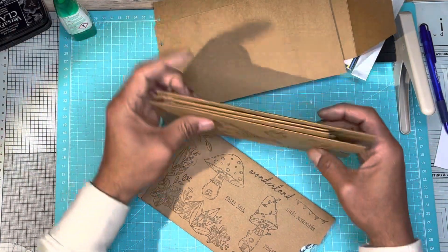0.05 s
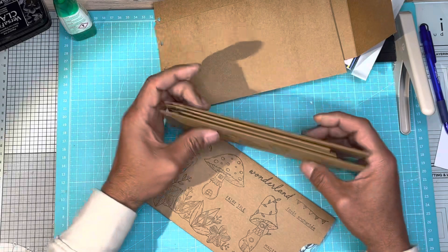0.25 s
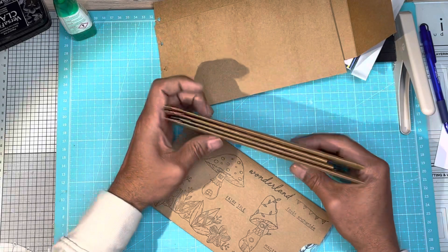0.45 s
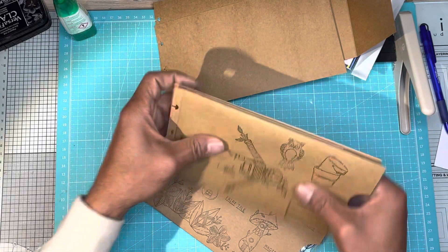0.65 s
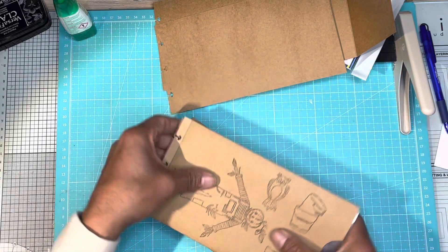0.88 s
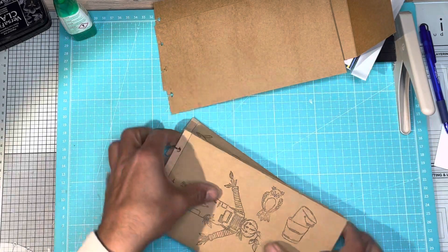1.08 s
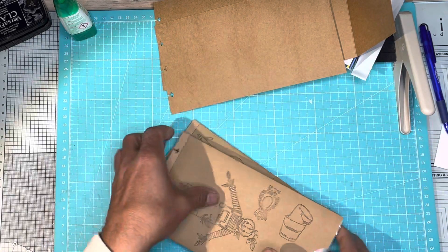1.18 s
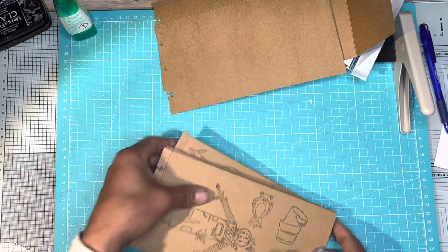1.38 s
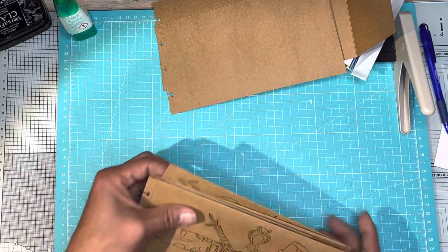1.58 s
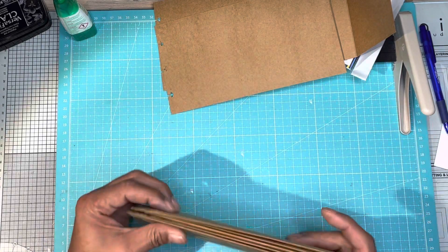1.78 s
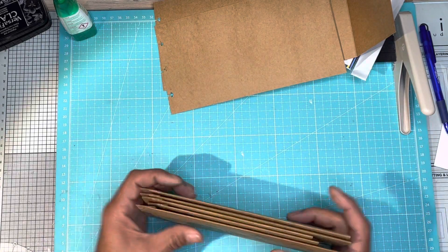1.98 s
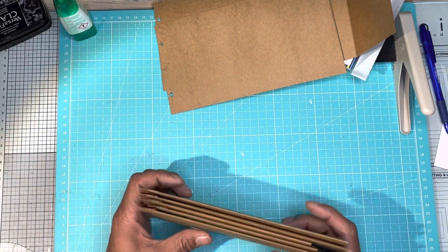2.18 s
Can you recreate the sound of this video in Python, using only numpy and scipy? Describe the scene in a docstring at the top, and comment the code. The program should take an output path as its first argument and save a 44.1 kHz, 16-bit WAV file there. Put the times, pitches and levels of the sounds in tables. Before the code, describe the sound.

A stack of stiff paper cards is knocked on edge against a table with a clattering thump. The cards slide and flick softly into line, then are knocked down again. Heard close up in a small, quiet room.

```python
"""Squaring a stack of cards.

Stiff kraft paper cards are knocked on edge against a craft table, shuffled into line and knocked again.
Faces slide with a fibrous rasp, the table thumps in its low modes, edges land one after another as
bursts of tiny clicks that ring the stack, and single edges flick past each other.
It is heard close up in a small, quiet room, with stereo widening."""
import sys
import numpy as np
from scipy import signal
from scipy.fft import rfft, irfft, next_fast_len
from scipy.io import wavfile

SR = 44100
rng = np.random.default_rng(int(sys.argv[2]) if len(sys.argv) > 2 else 0)


def store_wav(level_fs):
    """Save 16-bit WAV to argv[1]."""
    pcm = np.round(np.clip(np.atleast_2d(level_fs), -1, 1) * 32767)
    wavfile.write(sys.argv[1], SR, pcm.T.astype(np.int16))


N = 99225
FIBRE_HZ = 1484  # rate of the paper's roughness
TOP_HZ = 15900


def undb(db):
    """Decibels to gain."""
    return 10 ** (np.asarray(db) / 20)


def unit(x):
    """Scale to rms 1."""
    return x / np.sqrt(np.mean(x ** 2))


def flutter(hz, size):
    """Random values joined by lines, hz of them a second."""
    return np.interp(np.arange(size) * hz / SR, np.arange(size), rng.standard_normal(size))


def add(track, start_s, sound):
    """Mix a sound in at its time."""
    i = int(start_s * SR)
    lo, hi = max(i, 0), min(i + len(sound), N)
    track[lo:hi] += sound[lo - i:hi - i]


def ring(x, hz, t60_s):
    """One damped resonance, gain 1 at its pitch."""
    return signal.lfilter(*signal.iirpeak(hz, hz * t60_s * np.pi / np.log(1000), fs=SR), x)


def colour(x, points, body_db=0, treble_db=0, grip_db=0):
    """Unit-power filter through (Hz, dB) points, with two shelves and resonances that vary by grip."""
    body_hz, treble_hz, grip_spacing_hz = 900, 3204, 226.7
    size = next_fast_len(len(x) + 2048, real=True) * 2
    hz = np.maximum(np.fft.rfftfreq(size, 1 / SR), 1)
    point_hz, point_db = np.array(points).T
    curve_db = np.interp(np.log(hz), np.log(point_hz), point_db)
    curve_db += body_db / (1 + (hz / body_hz) ** 4) + treble_db / (1 + (treble_hz / hz) ** 4)
    curve_db += grip_db * np.interp(hz / grip_spacing_hz, np.arange(size), rng.standard_normal(size))
    cepstrum = irfft(np.log(unit(undb(curve_db))))
    cepstrum[1:size // 2] *= 2  # fold to minimum phase
    cepstrum[size // 2 + 1:] = 0
    return irfft(rfft(x, size) * np.exp(rfft(cepstrum)))[:len(x)]


# Spectrum of the room's noise. Each row: frequency in Hz, relative level in dB.
ROOM_SPECTRUM = [(22, -26.5), (36, -2.5), (60, 5.5), (120, -5.5), (250, -10.5), (700, -18.5), (2000, -12),
                 (5000, -11.5), (16000, -18)]


def room_noise(level_db=-65.5):
    """The room's faint steady noise."""
    return undb(level_db) * colour(rng.standard_normal(N), ROOM_SPECTRUM)


# Card faces sliding. Each row: fastest moment in seconds, rise in ms, fall in ms, level in dB,
# bass boost and equal treble cut in dB, rasp pitch in Hz.
SLIDES = [(0.202, 8.2, 55, -50, -6, 12900), (0.489, 12.4, 10.4, -56.5, 1, 3980),
          (0.585, 42, 6.5, -59.5, -3, 2060), (0.641, 6, 41, -56, -6, 4230), (.902, 27, 16.7, -49, -4, 5860),
          (0.953, 5.7, 24, -48, 3.5, 1000), (1.024, 14, 42, -44, -1, 970), (1.098, 15.3, 11, -49.5, 5, 860),
          (1.125, 11.3, 11.5, -49.5, 0, 12200), (1.188, 42, 35, -52.5, 5.5, 890),
          (1.222, 24, 10, -50.5, -2.5, 1210), (1.264, 14.5, 9.6, -50, -3, 7400),
          (1.335, 90, 120, -61, 3, 1340), (1.525, 9.3, 17.3, -48.5, -0.5, 1610),
          (1.589, 18, 16, -57, 3, 5230), (1.66, 22.8, 24.5, -47, 3, 4300),
          (1.723, 22, 16.6, -49.5, -2.5, 1330), (1.909, 11.3, 52, -45.5, -6, 2200),
          (2.025, 50, 37, -56, -15, 3930), (2.09, 10, 74, -63, 5.5, 2030)]
# Spectrum of a slide. Each row: frequency in Hz, relative level in dB.
SLIDE_SPECTRUM = [(80, 1.5), (250, -8.5), (450, -1), (650, -3.5), (950, 3.5), (1500, 1), (2100, 2.5),
                  (2900, -2.5), (4400, -1.5), (8000, -5), (13000, -10), (16000, -10.5)]


def slides(fibre_db=3, catch_hz=111, catch_db=3.5, rasp_db=2.5, rasp_q=11, stack_db=-0.5):
    """Each slide swells and fades; fibres rasp around one pitch and the cards catch and slip."""
    out, size = np.zeros(N), 16384
    ms = (np.arange(size) - size // 2) * 1000 / SR
    for peak_s, rise_ms, fall_ms, db, body_db, hz in SLIDES:
        rise = np.exp(-(ms / rise_ms) ** 2 / 2)
        fall = 1 / np.cosh(np.minimum(np.abs(ms / fall_ms) * np.sqrt(2), 20))
        speed = np.where(ms < 0, rise, fall)
        noise = rng.standard_normal(size)
        rough_db = fibre_db * flutter(FIBRE_HZ, size) + catch_db * flutter(catch_hz, size)
        fibres = speed * unit(noise * undb(rough_db))
        rasp = undb(rasp_db) * ring(fibres, hz, t60_s=np.log(1000) * rasp_q / (np.pi * hz))
        slide = colour(fibres + rasp, SLIDE_SPECTRUM, body_db, -body_db, grip_db=3.5)
        add(out, peak_s - size / 2 / SR, undb(db) * slide)
    return out + undb(stack_db) * stack_ring(out)


# Modes of the stack on the mat. Each row: frequency in Hz, gain in dB, T60 in seconds.
STACK_MODES = [(824.5, 0.5, 0.089), (1038, -3, 0.21), (1207, -6, 0.03), (1400, -14, 0.039),
               (1530, -13.5, 0.22), (2007, -6.5, 0.13), (3890, -9, 0.055)]


def stack_ring(x):
    """The stack rings hollow when its cards slide or land."""
    return sum(undb(db) * ring(x, hz, t60_s) for hz, db, t60_s in STACK_MODES)


# Pushes on the table top. Each row: start in seconds, level in dB, tilt in dB per octave.
THUMPS = [(0.196, -45.5, 0), (0.2467, -21, 3), (0.459, -54.5, 1), (0.949, -39.5, -2.5), (1.10, -49.5, 4.5),
          (1.136, -45, -8.5), (1.199, -49, -6), (1.287, -44.5, -0.5), (1.645, -55, 6.5), (1.896, -42.5, 6),
          (1.933, -32.5, 5), (1.971, -29.5, -1)]
# Modes of the table. Each row: frequency in Hz, gain in dB, T60 in seconds.
TABLE_MODES = [(45.7, -19, 0.3), (85.8, 5, 0.16), (114, 10.5, 0.099), (175.3, -5.5, 0.11),
               (313, -11.5, 0.086), (389.5, -23, .12), (539.6, -18, 0.052)]


def table_thumps(swell_cycles=2.47):
    """The table top swells into its low modes after each push and dies away."""
    out, t = np.zeros(N), np.arange(SR // 2) / SR
    pivot_hz = TABLE_MODES[1][0]
    for start_s, db, tilt_db in THUMPS:
        for hz, mode_db, t60_s in TABLE_MODES:
            swell = 1 - np.exp(-(t * hz / swell_cycles) ** 2)
            decay = np.exp(-np.log(1000) * t / t60_s)
            gain = 2 * undb(db + mode_db + tilt_db * np.log2(hz / pivot_hz))
            add(out, start_s, gain * swell * decay * np.sin(2 * np.pi * hz * t))
    return out


def contact(decay_ms, attack_ms, rough_db=3, size=4096):
    """A paper edge meets something: a fast burst of tiny clicks that dies away."""
    ms = np.arange(size) * 1000 / SR
    envelope = (1 - np.exp(-ms / attack_ms)) * np.exp(-ms / decay_ms)
    phase = np.angle(rfft(envelope * rng.standard_normal(size)))
    clicks = np.sign(irfft(np.exp(1j * phase)))  # signs of a spectrally flat burst
    roughness = undb(rough_db * flutter(FIBRE_HZ, size))
    return unit(envelope * clicks * roughness) * np.sqrt(decay_ms / ms[-1])


# Edges landing. Each row: start in seconds, level in dB, decay in ms, bass in dB, treble in dB.
LANDINGS = [(.218, -39, 7.5, 24, 11), (0.2326, -23, 3, -20, 8), (0.2341, -27.5, 4.2, -3, 0),
            (.239, -36, 7, 28, -9), (0.2422, -29.5, 2.9, -13, 10), (0.2455, -20.5, 5.3, -6, 11),
            (.2492, -25, 2.5, 10, 9), (0.2504, -13.5, 1.91, -6, 2), (0.26, -37, 6.3, -21, -17),
            (0.455, -39, 2.4, -2.5, -3.5), (0.945, -39.5, 7.7, 9, -1), (1.282, -43.5, 1.75, 8.5, -15),
            (1.893, -44.5, 22, 18, -15), (1.9318, -28, 4.6, -6.5, -2), (1.9393, -29.5, 3.8, -4, 9),
            (1.9485, -25, 3.45, -8.5, 10.5), (1.9497, -20.5, 3.2, 3.5, -17.5), (1.9699, -25, 4, 13.5, 6.5),
            (1.9739, -36.5, 3.7, 9, -8), (2.146, -52.5, 1.74, 5, -3), (2.211, -57.5, 4.5, 17.5, -2)]
# Spectrum of a landing. Each row: frequency in Hz, relative level in dB.
LANDING_SPECTRUM = [(70, -19), (200, -4.5), (450, -4), (650, -3.5), (830, -2.5), (1050, -4), (1500, -1.5),
                    (2050, -3.5), (2700, -9.5), (3900, -12.5), (5500, -20.5), (8000, -23.5), (12500, -29.5),
                    (16000, -27.5)]


def landings(crack_db=-12.5, crack_ms=1.1, crack_hz=4200):
    """Cards drop on edge onto the mat: the edge cracks, the card follows and the stack rings."""
    out = np.zeros(N)
    highpass = signal.butter(2, crack_hz, "high", fs=SR)
    for start_s, db, decay_ms, body_db, treble_db in LANDINGS:
        crack = undb(crack_db) * signal.lfilter(*highpass, contact(crack_ms, crack_ms / 10))
        card = contact(decay_ms, attack_ms=0.94)
        landing = colour(crack + card, LANDING_SPECTRUM, body_db, treble_db, grip_db=4.5)
        add(out, start_s, undb(db) * landing)
    return out + stack_ring(out)


# Edges flicking. Each row: start in seconds, level in dB, decay in ms, treble in dB, ring pitch in Hz.
FLICKS = [(0.517, -51, 1, -4, 3980), (0.593, -48, 2.1, -2, 2620), (0.658, -50, 4.6, -1, 1860),
          (0.694, -35.5, 1.6, -5.5, 1903), (1.127, -42, 1.2, 10, 3900), (1.225, -48, 2.4, -3, 4260),
          (1.269, -48, 1.5, 1, 2870), (1.386, -52, 3, -0.5, 1200), (1.481, -47, 5.5, 3, 1066),
          (1.517, -49, 3.4, -17, 1660), (1.6425, -42, 1.6, -7, 2990), (1.701, -45, 4.6, -3, 1264),
          (1.705, -45, 1.47, -10.5, 2420), (1.812, -49.5, 4.35, 17, 3194)]
# Spectrum of a flick. Each row: frequency in Hz, relative level in dB.
FLICK_SPECTRUM = [(100, -14), (500, -11), (1000, -5), (1500, -10.5), (2000, -1), (3000, -8.5), (5000, -4.5),
                  (8000, -10), (12500, -13.5), (16000, -11)]


def flicks(ring_db=12.5, overtone_ratio=2.6, overtone_db=5.5, t60_s=0.013):
    """Single edges snap past their neighbours and ring briefly, with one overtone."""
    out = np.zeros(N)
    for start_s, db, decay_ms, treble_db, hz in FLICKS:
        burst = contact(decay_ms, attack_ms=1)
        snap = undb(db) * colour(burst, FLICK_SPECTRUM, treble_db=treble_db, grip_db=4.5)
        tone = undb(ring_db) * ring(snap, hz, t60_s)
        overtone = undb(overtone_db) * ring(snap, min(hz * overtone_ratio, TOP_HZ), t60_s)
        add(out, start_s, snap + tone + overtone)
    return out


def near_reflections(x):
    """The table and hands scatter the sound over a few milliseconds."""
    scatter = contact(decay_ms=6.4, attack_ms=0.27)
    return signal.fftconvolve(x, scatter / np.linalg.norm(scatter))[:N]


def room_echo(x, level_db=-21.5, t60_s=0.35, build_s=0.013):
    """The room's short, soft tail."""
    t = np.arange(SR) / SR
    envelope = np.exp(-np.log(1000) * t / t60_s) * (1 - np.exp(-(t / build_s) ** 2))
    tail = unit(rng.standard_normal(SR) * envelope) / np.sqrt(SR)
    tail = colour(tail, [(1, 0), (SR, 0)], treble_db=1.5)
    return undb(level_db) * signal.fftconvolve(x, tail)[:N]


# Phase of the stereo widening. Each row: frequency in Hz, lead of the left channel in radians.
LEFT_LEAD = [(0, 0), (600, -.5), (850, -.2), (1750, -.15), (2600, 2.3), (3800, .85), (5100, 1.4),
             (5950, 3.14), (8000, 6.28), (8800, 6.7), (9800, 9.2), (10850, 9.6), (11900, 12.4),
             (13000, 12.7), (14000, 15.3), (16000, 16.1)]


def stereo_widening(common, apart, apart_hz=3510):
    """The phase between left and right varies with pitch; `apart` is added left, subtracted right."""
    hz = np.fft.rfftfreq(2 * N, 1 / SR)
    lead = np.interp(hz, *np.array(LEFT_LEAD).T)
    mid = rfft(common, 2 * N)
    side = rfft(apart, 2 * N) * np.maximum(np.abs(np.sin(lead)), np.exp(-hz / apart_hz))
    return np.array([irfft((mid + sign * side) * np.exp(sign * .5j * lead))[:N] for sign in (1, -1)])


def scene():
    """Cards and table, with near reflections, the room's echo and its noise."""
    cards = landings() + flicks() + slides()
    thumps, noise = table_thumps(), room_noise()
    direct = cards + thumps
    nearby = near_reflections(undb(-8.5) * (cards + noise) + undb(-33.5) * thumps)
    return stereo_widening(common=direct + room_echo(direct) + noise, apart=nearby + room_echo(cards))


def record(dry):
    """A steep low-pass cuts the top."""
    return signal.sosfilt(signal.ellip(10, .2, 80, TOP_HZ, fs=SR, output="sos"), dry)


dry = scene()
out = record(dry)
store_wav(out)
```